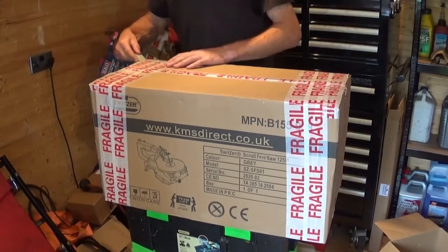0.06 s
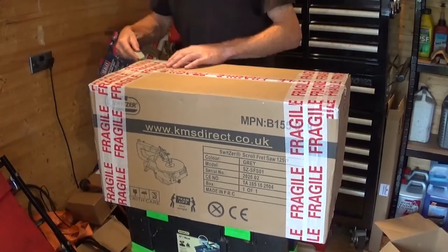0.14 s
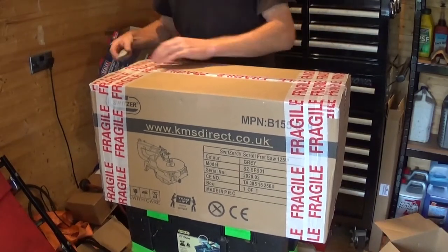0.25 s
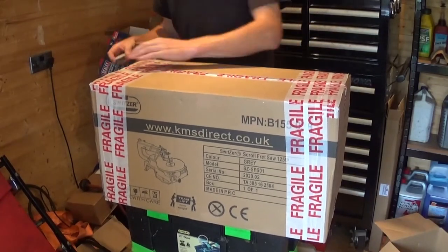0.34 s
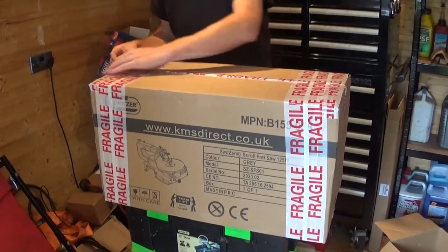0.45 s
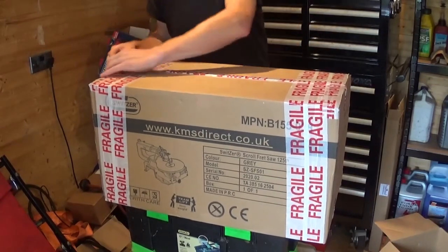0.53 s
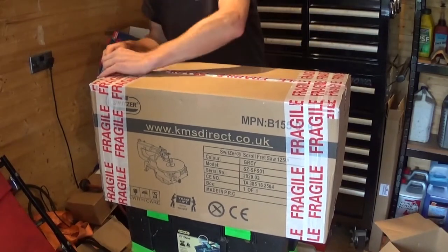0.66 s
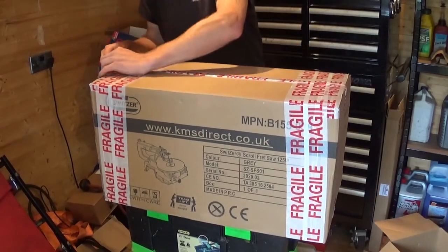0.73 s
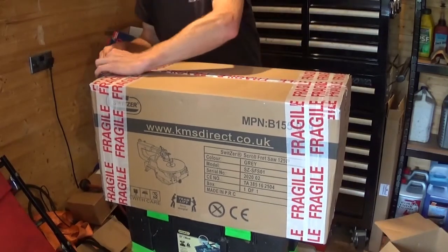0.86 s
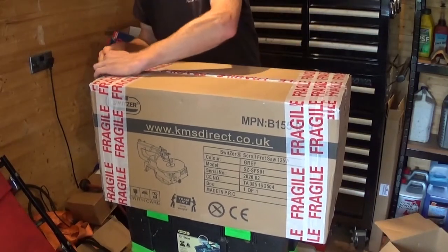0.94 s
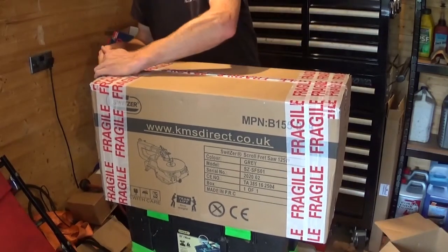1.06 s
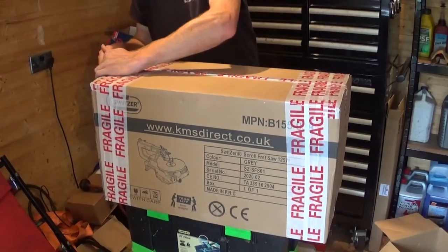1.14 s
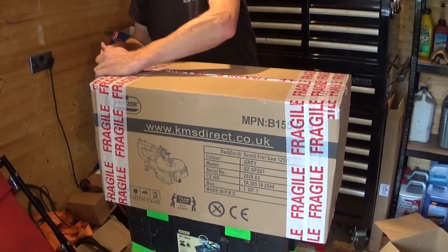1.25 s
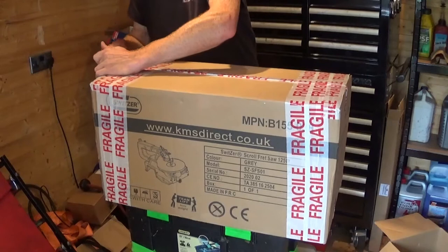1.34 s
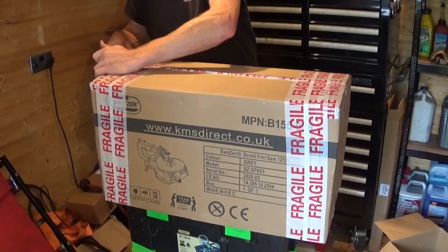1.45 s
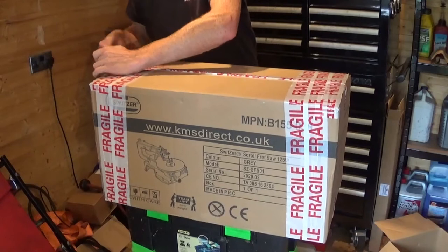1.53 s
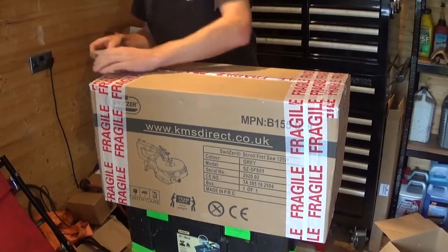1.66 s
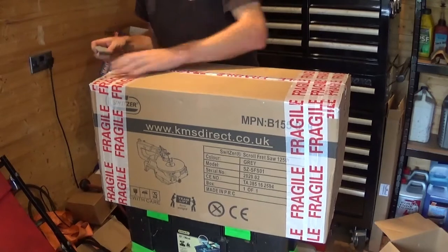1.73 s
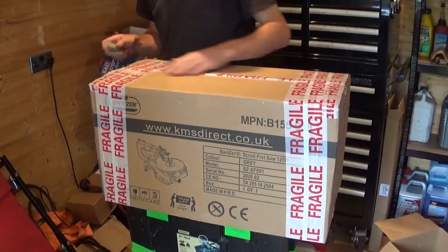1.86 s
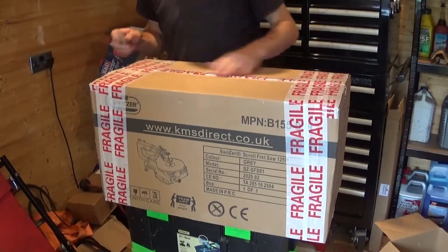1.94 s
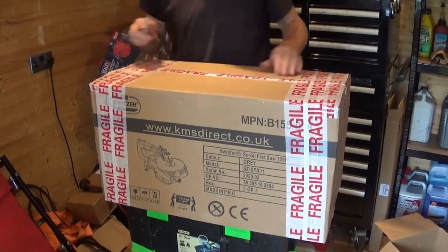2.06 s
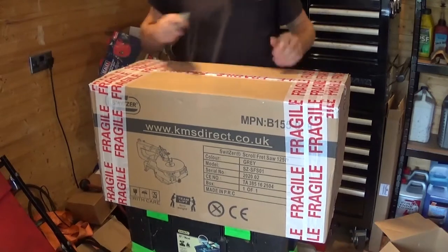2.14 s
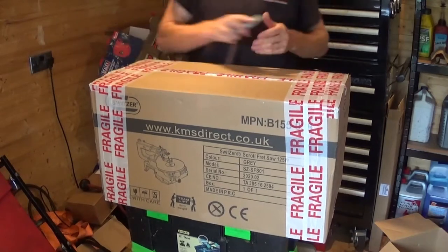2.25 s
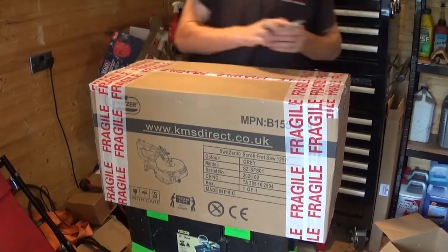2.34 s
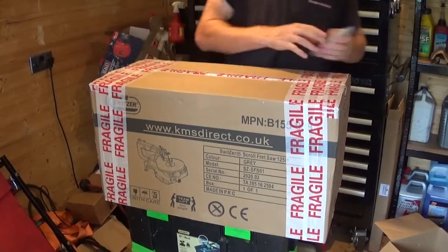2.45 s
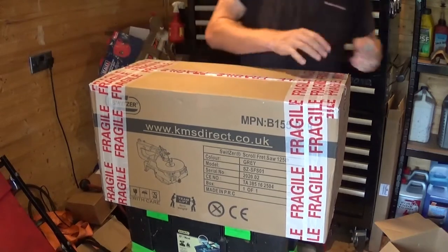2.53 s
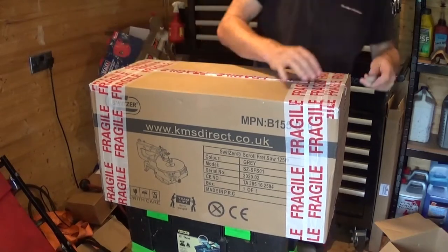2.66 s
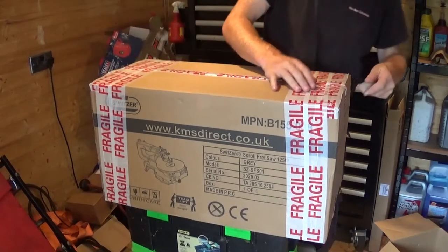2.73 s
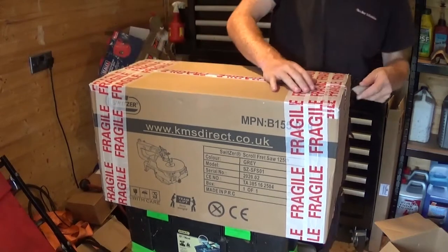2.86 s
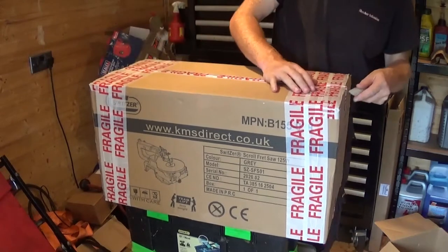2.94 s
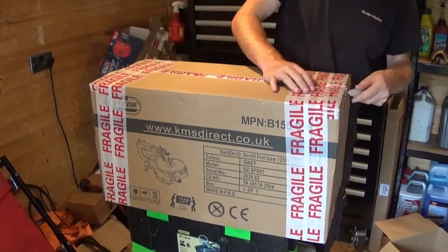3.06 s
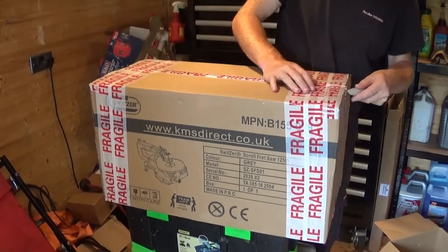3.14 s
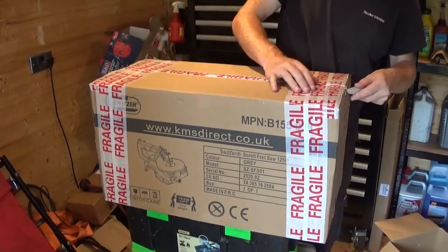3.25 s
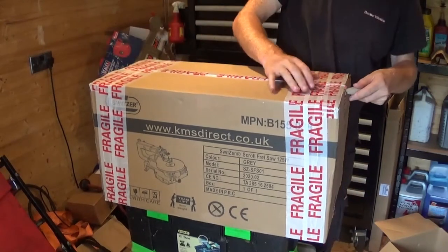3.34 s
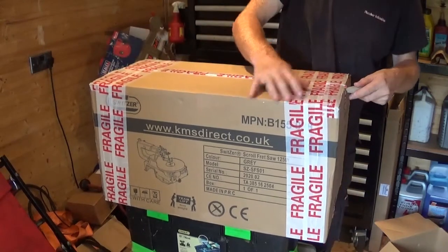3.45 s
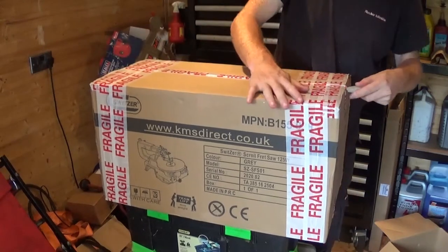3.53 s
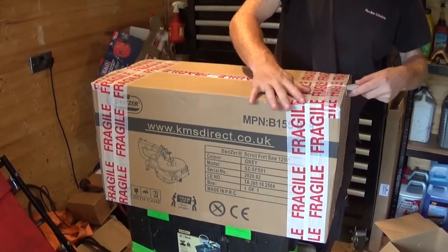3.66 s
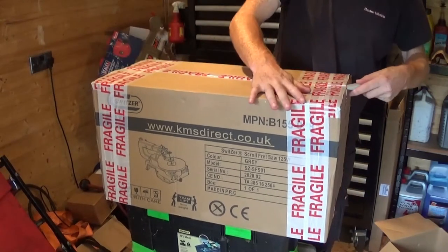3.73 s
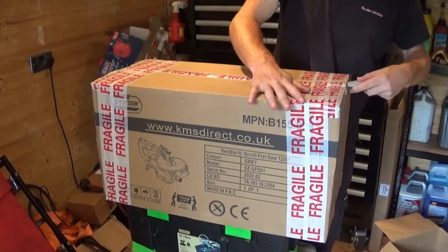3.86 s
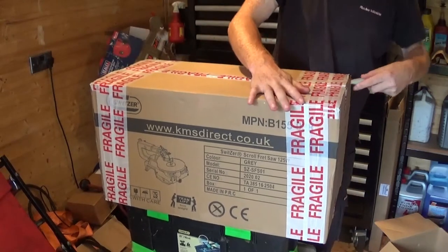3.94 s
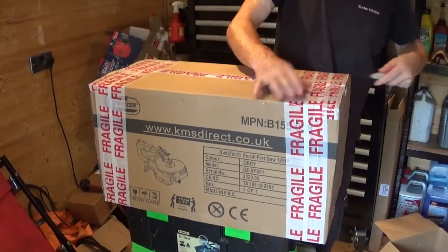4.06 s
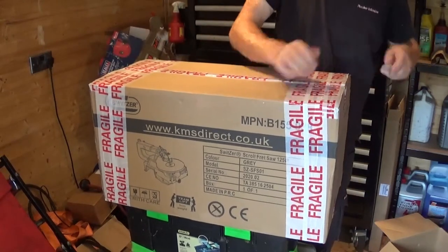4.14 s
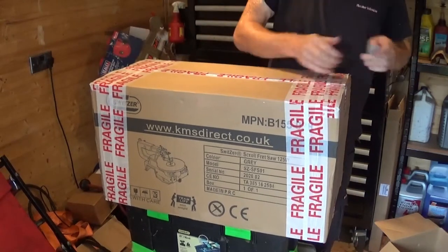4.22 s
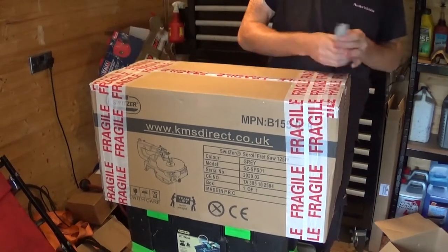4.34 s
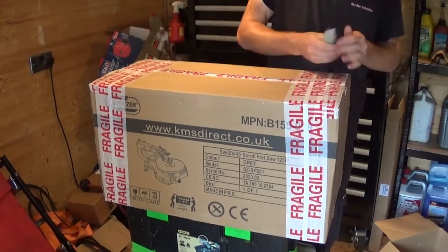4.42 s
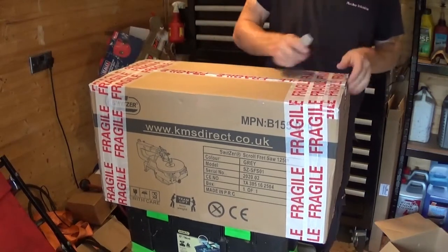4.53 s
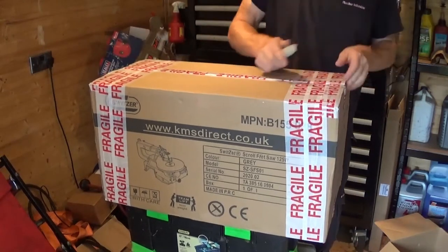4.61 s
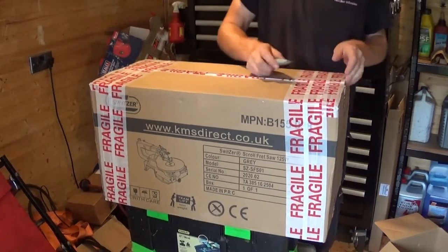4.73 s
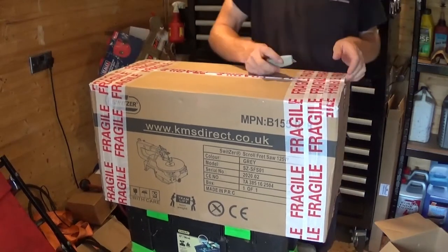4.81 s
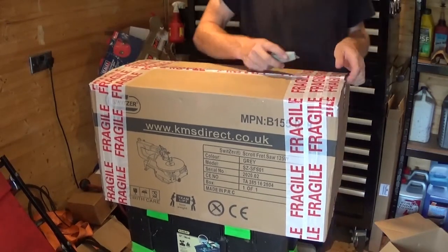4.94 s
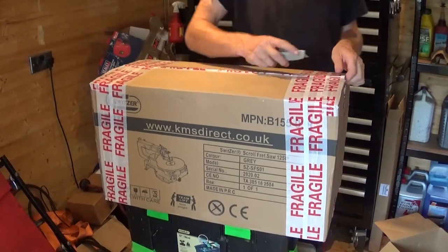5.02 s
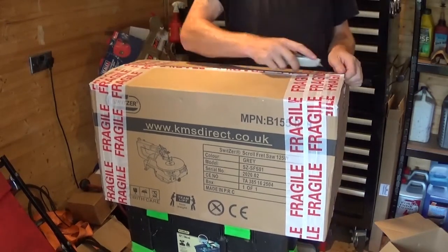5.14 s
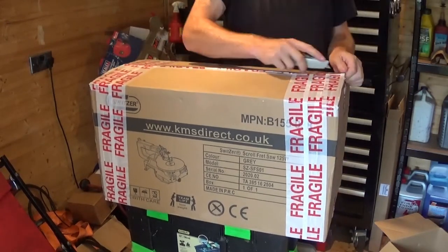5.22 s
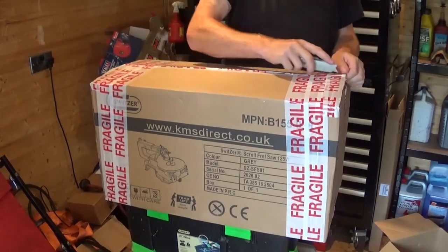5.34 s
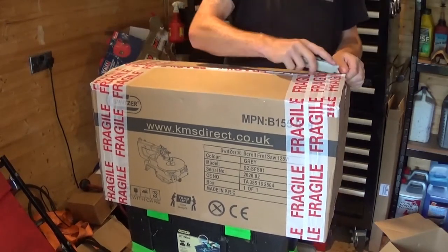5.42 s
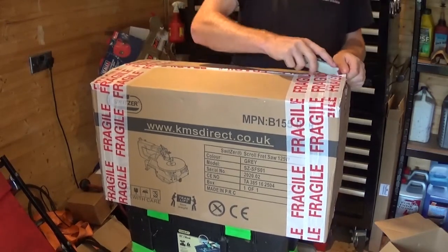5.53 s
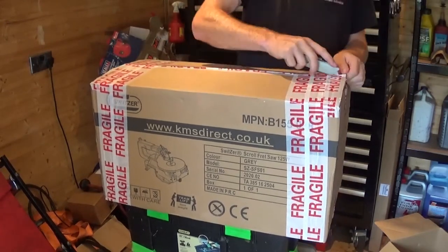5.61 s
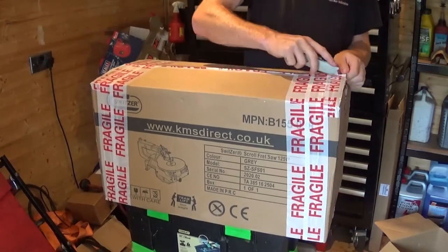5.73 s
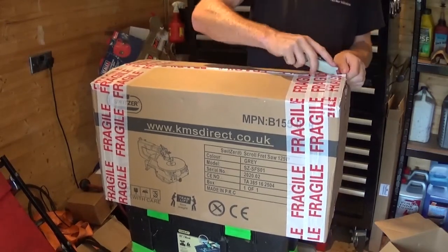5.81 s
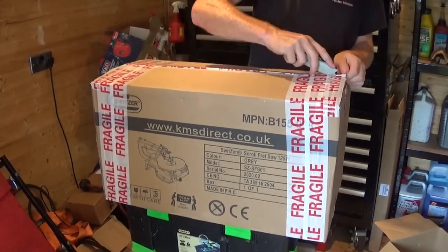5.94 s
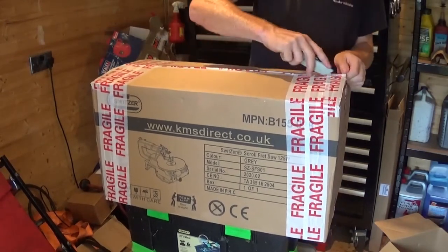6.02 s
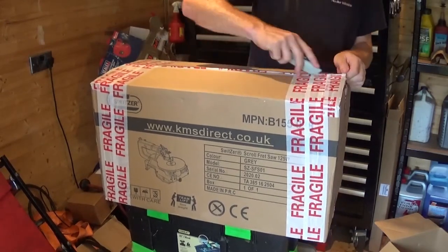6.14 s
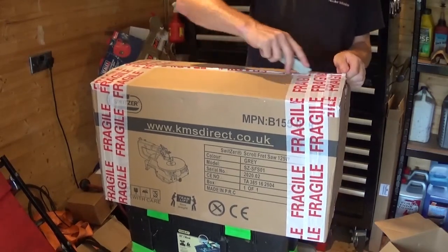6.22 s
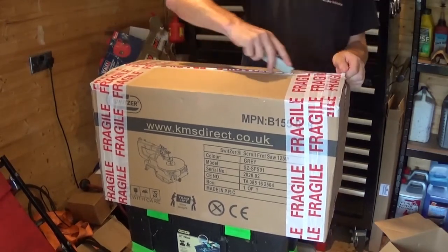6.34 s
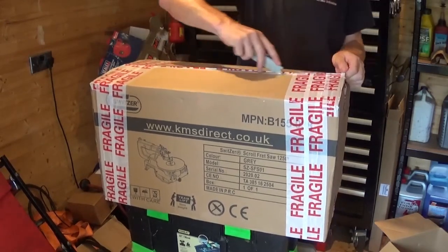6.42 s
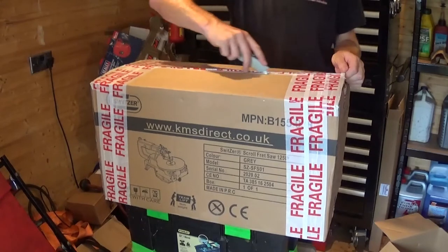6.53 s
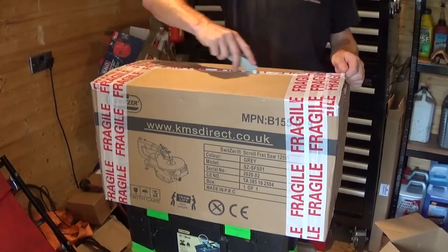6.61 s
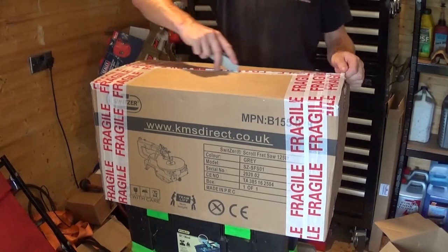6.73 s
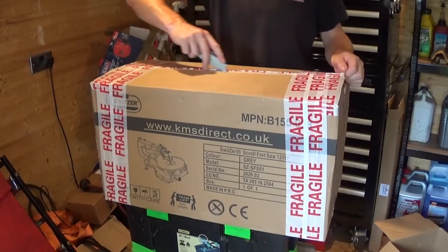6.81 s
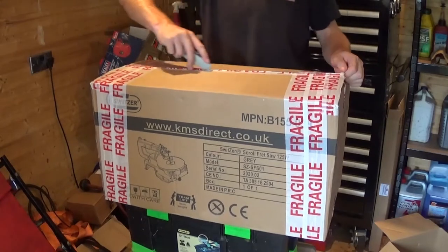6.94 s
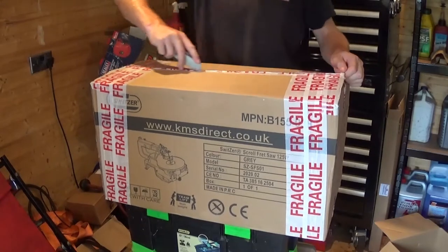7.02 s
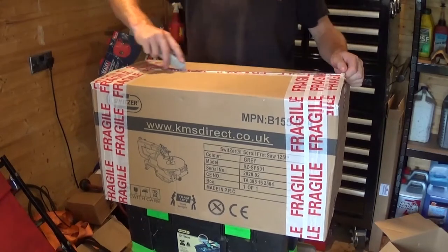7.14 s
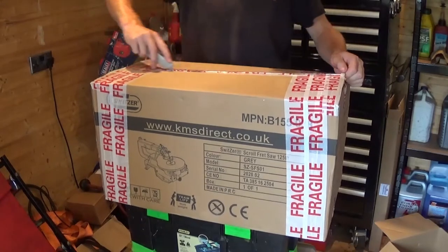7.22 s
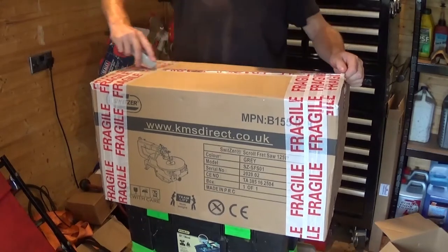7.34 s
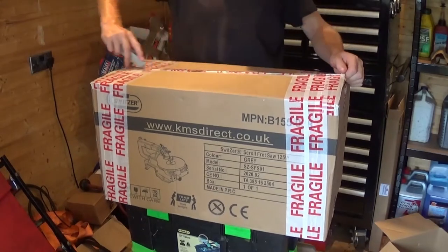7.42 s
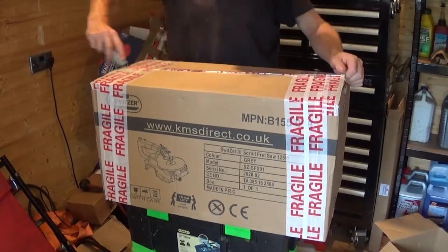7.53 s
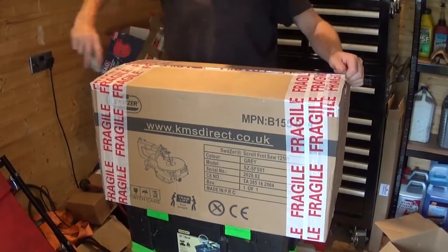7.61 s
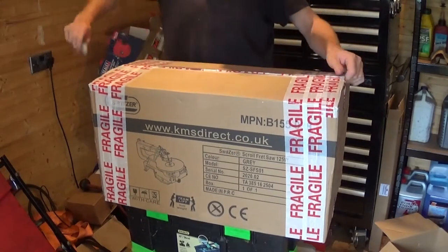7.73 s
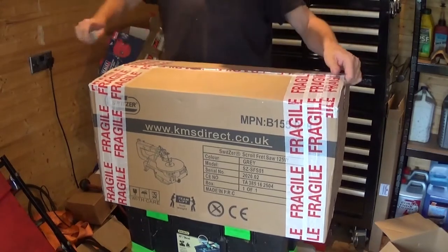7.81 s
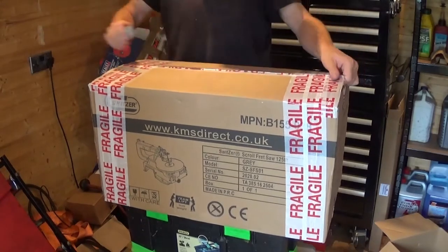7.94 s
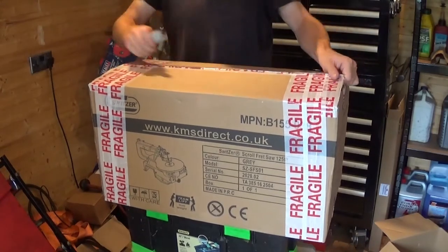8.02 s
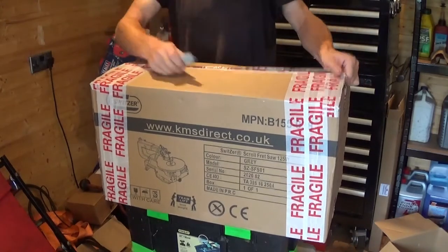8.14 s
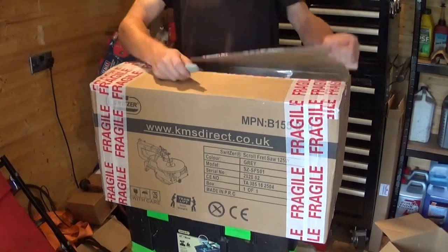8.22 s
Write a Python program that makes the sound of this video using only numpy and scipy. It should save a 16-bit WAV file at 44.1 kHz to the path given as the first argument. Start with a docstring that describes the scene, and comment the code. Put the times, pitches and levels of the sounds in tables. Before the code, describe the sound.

Hands rub a cardboard box and a knife cuts its packing tape with sharp snaps, then a long rasping slit.

```python
"""A utility knife opens a big taped carton in a small workshop, over hiss, hum and faint camera ticks.
First hands slide and bump on the lid; friction and impact drive tape, board and hollow box together.
Short strokes then cut the tape at both ends, fibres breaking and taut tape snapping; between them
fingers squeak, the carton settles, and knife and nails tap. From six seconds one long slit runs down
the seam, and at eight a flap tears free."""
import sys
import numpy as np
from scipy import signal
from scipy.fft import rfft, irfft
from scipy.io import wavfile

SR = 44100
rng = np.random.default_rng(int(sys.argv[2]) if len(sys.argv) > 2 else 0)


def int16_out(signal):
    """Quantize to a 16-bit WAV file."""
    q = np.round(np.clip(np.atleast_2d(signal).T, -1, 1) * 32767)
    wavfile.write(sys.argv[1], SR, q.astype(np.int16))


N = 364707
TIME = np.arange(N) / SR


def undb(db):
    """Amplitude grows tenfold for every 20 dB."""
    return 10 ** (np.asarray(db) / 20)


def unit(x):
    """Normalisation: scale to an rms of 1."""
    return x / np.sqrt(np.mean(x ** 2))


def convolve(x, impulse_response):
    """A linear system convolves its input with its impulse response."""
    return signal.fftconvolve(x, impulse_response)[:N]


def response(spectrum, modes=(), size=8192):
    """Minimum-phase impulse response of unit energy: resonance peaks on a broad spectrum."""
    hz = np.maximum(np.fft.rfftfreq(size, 1 / SR), 1)
    knots_hz, knots_db = np.transpose(spectrum)
    broad = undb(np.interp(np.log(hz), np.log(knots_hz), knots_db))
    peaks = sum(undb(db) / (1 + (2 * (hz - centre) / width) ** 2) for centre, width, db in modes)
    cepstrum = irfft(np.log(broad * (1 + peaks)))
    ring = irfft(np.exp(rfft(2 * cepstrum[:size // 2], size)))
    return ring / np.linalg.norm(ring)


def colour(x, spectrum, modes=()):
    """Source and filter: the excitation x takes on a spectrum and its resonances."""
    return convolve(x, response(spectrum, modes))


def walk(rate):
    """Slow noise of rms 1: straight lines join random values, rate per second."""
    steps = rng.standard_normal(N)
    return unit(np.interp(TIME * rate, np.arange(N), steps))


def spread(mid, side, width, bass_hz):
    """Mid-side stereo: long waves reach two nearby points alike, so the side loses its bass."""
    side = signal.sosfilt(signal.butter(1, bass_hz, "high", fs=SR, output="sos"), side)
    return mid + width * side * np.array([[1], [-1]])


# Spectrum of the hiss. Each row: frequency in Hz, relative spectral density in dB.
HISS_SPECTRUM = [(25, -15), (96, -8), (178, -6.5), (500, 0), (1000, -1), (1860, -3), (2620, -0.5),
                 (3400, -2.5), (4200, -4), (9000, -5), (11000, -11.5)]
def background(hiss_db=-59.5, hum_db=-80.5, hum_hz=102, chirp_db=-52, chirp_hz=3490):
    """Noise floor: broadband hiss, a mains hum and the camera's periodic train of tiny tone bursts."""
    mid, side = (colour(rng.standard_normal(N), HISS_SPECTRUM) for _ in range(2))
    hiss = undb(hiss_db + .5 * walk(7)) * spread(mid, side, width=0.59, bass_hz=20)
    hum = undb(hum_db) * np.sqrt(2) * np.sin(2 * np.pi * hum_hz * TIME)
    from_peak_s = TIME % .04 - .0188  # 25 bursts a second
    envelope = np.exp(-(from_peak_s / 0.0033) ** 2)
    chirp = envelope * np.sin(2 * np.pi * chirp_hz * from_peak_s + .6 * walk(19))
    return hiss + hum + undb(chirp_db + 0.73 * walk(24.4)) * chirp


def grains(rate, spread_db):
    """Shot noise: slips and breaking fibres are random impulses of unequal size, rate per second."""
    hit = rng.random(N) < rate / SR
    size = undb(spread_db * np.minimum(rng.standard_normal(N), 2))
    return unit(hit * size * rng.choice([-1, 1], N))


def strokes(table, hollow_re_board_db, end_share, curve):
    """Force envelopes on surface, board and hollow: each stroke builds, slackens and lifts off."""
    forces = np.zeros((3, N))
    for start, rise, length, db, board_db in table:
        shape = np.interp(TIME - start, [0, rise, max(length, rise)], [0, 1, end_share], right=0)
        path_db = np.array([[0], [board_db], [board_db + hollow_re_board_db]])
        forces += undb(db + path_db) * shape ** curve
    return forces


# Normal modes of the carton. Each row: frequency in Hz, width in Hz, dB relative to the broad response.
CARTON_MODES = [(200, 9.4, 1), (253, 24, -0.5), (368, 16, -1), (403, 23, -5), (528.3, 95, 4.5),
                (659, 24, 1), (1020, 9, -31), (1162, 150, -4.5), (1322, 15, -1.5), (1590, 44, -6),
                (1857, 36, -9), (2066, 43, -5)]
# Spectrum of the corrugated board. Each row: frequency in Hz, relative level in dB.
BOARD_SPECTRUM = [(250, -26.5), (500, 0.5), (750, 1.5), (1200, -0.5), (1900, -0.5), (2600, -2), (4500, -11),
                  (10000, -68)]
def carton(slips, surface_spectrum, hollow_spectrum, forces):
    """Forced vibration: the same slips radiate from the surface, the board and the hollow box."""
    surface_force, board_force, hollow_force = forces
    surface = colour(slips * surface_force, surface_spectrum)
    board = colour(slips * board_force, BOARD_SPECTRUM, CARTON_MODES)
    hollow = colour(slips * hollow_force, hollow_spectrum, CARTON_MODES)
    return surface + board + hollow


# Spectra of rubbing skin, cracking tape and the hollow box driven at its stiff ends.
# Each row: frequency in Hz, relative level in dB.
SKIN_SPECTRUM = [(800, -64), (1800, -10), (2700, -1.5), (4000, 4.5), (5500, 9), (7000, 7.5), (9500, 7.5),
                 (11000, -3)]
CRACK_SPECTRUM = [(500, -15), (1800, -47), (3200, -1), (5200, 2.5), (7000, 3.5), (9500, 0), (11000, -2)]
STIFF_END_SPECTRUM = [(25, -34), (65, -21), (125, -29), (170, -9), (215, -4.5), (340, 2), (530, 7.5),
                      (800, -9), (2000, -46), (8000, -82)]
# A hand lands and skids to rest.
# Each row: start in seconds, surface level in dB, board level in dB relative to the surface.
HAND_LANDINGS = [(0, -30, -8.5), (0.374, -43.5, -9.5), (0.536, -45, -9), (0.707, -40.5, -3.5),
                 (.862, -45, -6.5), (1.149, -48, -5.5), (1.398, -44.5, -6), (1.484, -46.5, -1.5),
                 (2.659, -48, -4), (2.931, -54, -15), (3.339, -50, -0.5), (3.404, -44.5, -2.5),
                 (4.479, -47.5, -4.5), (4.575, -45, -4.5), (7.549, -42, -11)]
# A resting hand slides on, swelling and fading with its speed.
# Each row: start and length in seconds, surface level in dB, board level in dB relative to the surface.
HAND_SLIDES = [(0.461, 0.1, -48.5, -9), (0.58, 0.12, -50.5, -1), (0.71, 0.19, -48, -15),
               (1.187, 0.11, -51, 2.5), (1.28, 0.15, -38, -8.5), (1.7, .33, -32.5, -16),
               (2.01, 0.64, -57.5, -5), (2.813, 0.14, -56.5, -4.5), (3.415, 0.17, -37.5, -12),
               (3.606, 0.46, -46, -1.5), (4.24, 0.25, -55.5, -13), (4.657, 0.19, -50.5, -8),
               (4.829, 0.16, -48, -2.5), (5.038, 0.21, -43, -5), (7.631, 0.26, -41.5, -4.5),
               (7.84, 0.21, -46, -1.5)]
def rubs(landing_rise_s=0.002, landing_length_s=0.12, slide_peak_share=0.4, crinkle_db=-11):
    """Sliding friction: skin catches on tape and card in a fine grain, and the tape sometimes crinkles."""
    slips = grains(rate=12000, spread_db=4.0) * undb(1.2 * walk(90) + 1.1 * walk(30))
    crinkles = grains(rate=66, spread_db=5.5)
    landings = [(start, landing_rise_s, landing_length_s, *levels) for start, *levels in HAND_LANDINGS]
    slides = [(start, slide_peak_share * length, length, *levels)
              for start, length, *levels in HAND_SLIDES]
    forces = strokes(landings, hollow_re_board_db=-3, end_share=0.037, curve=1.25)
    forces += strokes(slides, hollow_re_board_db=-3, end_share=0.012, curve=0.72)
    brushing = carton(slips, SKIN_SPECTRUM, STIFF_END_SPECTRUM, forces)
    return brushing + undb(crinkle_db) * colour(crinkles * forces[0], CRACK_SPECTRUM)


def impact(decay_s, click_ratio, size=4096):
    """Impulsive excitation of unit energy: a clean click, then an exponentially dying scatter."""
    t = np.arange(size) / SR
    burst = rng.standard_normal(size) * np.exp(-t / decay_s) * np.minimum(t / decay_s * 2, 1)
    burst[0] = click_ratio * np.linalg.norm(burst)
    return burst / np.linalg.norm(burst)


def strike(start_s, peak_db, force, body):
    """Transient response: a force sets a body ringing, scaled to the given peak level."""
    ring = signal.fftconvolve(force, body)
    return np.pad(undb(peak_db) * ring / np.abs(ring).max(), (int(start_s * SR), N))[:N]


# The hollow box driven in the slack middle of its lid. Each row: frequency in Hz, relative level in dB.
SLACK_LID_SPECTRUM = [(25, -38), (65, -21.5), (125, -27), (160, -9.5), (200, -1), (340, 2.5), (530, 0),
                      (800, -7.5), (2000, -62.5), (8000, -82)]
# Hands and knife bump the box. Each row: start in seconds, peak level of the hollow in dB.
BOX_BUMPS = [(0.549, -39.5), (0.711, -30.5), (2.076, -46), (2.189, -38), (4.497, -41), (4.618, -42),
             (4.81, -41.5), (4.895, -33.5), (4.987, -37), (5.112, -47), (5.175, -41), (5.355, -47),
             (6.024, -27.5), (7.101, -16), (8.154, -20)]
def bumps(board_re_hollow_db=2.5):
    """Modal ringing: each soft blow excites the panels' modes in its own proportions."""
    hollow = response(SLACK_LID_SPECTRUM, CARTON_MODES)
    board = response(BOARD_SPECTRUM, CARTON_MODES)
    out = np.zeros(N)
    for start, db in BOX_BUMPS:
        force = impact(decay_s=0.011, click_ratio=1.1)
        out += strike(start, db, force, hollow)
        out += strike(start, db + board_re_hollow_db, force, board)
    return out


# Spectrum of tape being cut. Each row: frequency in Hz, relative level in dB.
CUT_SPECTRUM = [(800, -36), (1800, 4.5), (2700, 7), (4000, 4.5), (5500, 4.5), (7000, 4.5), (9500, 2.5),
                (11000, -6)]
# Short cuts and, last, the tearing flap.
# Each row: start, rise and length in seconds, tape level in dB, board level in dB relative to the tape.
CUTS_AND_TEARS = [(1.234, 0.0011, .058, -18.5, -9), (1.275, 0.014, 0.031, -27, 1.5),
                  (3.478, 0.012, 0.059, -23, -7.5), (3.752, 0.0013, 0.018, -28.5, -12.5),
                  (3.764, 0.0055, 0.046, -22, -4.5), (3.851, 0.0014, 0.018, -27.5, -3),
                  (3.902, 0.00088, 0.032, -30.5, -7), (5.785, 0.0014, 0.05, -22.5, -9),
                  (5.838, 0.0051, 0.065, -23.5, -10), (8.047, 0.0018, 0.045, -38, -2.5),
                  (8.0755, 0.0024, 0.057, -18.5, -4), (8.128, .0016, 0.039, -18.5, 2.5)]
def cuts():
    """Acoustic emission: tape and board rip in a dense burst of breaking fibres."""
    breaks = grains(rate=13000, spread_db=4.0) * undb(2.24 * walk(400))
    forces = strokes(CUTS_AND_TEARS, hollow_re_board_db=-2.5, end_share=0.3, curve=0.86)
    return carton(breaks, CUT_SPECTRUM, STIFF_END_SPECTRUM, forces)


# Taut tape snaps at the blade. Each row: start in seconds, peak level in dB.
TAPE_SNAPS = [(1.2351, -4.5), (5.7859, -6.5), (5.8392, -4), (6.0047, -19.5), (6.0205, -10), (6.057, -11.5),
              (6.08, -13.5), (6.091, -11), (6.206, -7.5), (6.244, -8), (6.3114, -5.5), (6.4545, -12.5),
              (6.635, -13.5), (7.097, -7), (7.486, -7.5), (7.55, -13.5), (8.0768, -5)]
def snaps():
    """Sudden release of tension: stretched tape parts with a dry, bright crack."""
    tape = response(CRACK_SPECTRUM, modes=[(5900, 2300, -4.5), (9070, 710, 1.0)])
    return sum(strike(start, db, impact(decay_s=0.00078, click_ratio=0.67), tape)
               for start, db in TAPE_SNAPS)


# Fingers squeak on the glossy tape.
# Each row: start and length in seconds, first and last pitch in Hz, level in dB.
FINGER_SQUEAKS = [(1.596, 0.058, 2620, 2620, -56), (1.727, 0.055, 2550, 2580, -41),
                  (1.799, 0.18, 1620, 1614, -45.5), (1.893, 0.052, 1350, 1280, -40),
                  (4.283, 0.11, 2590, 2410, -51), (5.577, 0.094, 2900, 3830, -59)]
def squeaks(jitter=0.034):
    """Stick-slip oscillation: skin grips and lets go fast enough to give a faint, rough whistle."""
    waver = 1 + jitter * walk(500)
    grip = unit(undb(6.7 * walk(170)))
    out = np.zeros(N)
    for start, length, first_hz, last_hz, db in FINGER_SQUEAKS:
        along = np.clip((TIME - start) / length, 0, 1)
        hz = (first_hz + (last_hz - first_hz) * along) * waver
        out += undb(db) * np.sin(np.pi * along) * np.sin(2 * np.pi * np.cumsum(hz) / SR)
    return out * grip


def rocking(start_s=2.075, length_s=0.11, db=-65):
    """Damped vibration: let go, the heavy carton settles on its stand with a low shudder."""
    spectrum = [(20, -12), (45, -2), (90, -1), (140, -13), (400, -15), (2000, -72)]  # Hz, dB
    shudder = colour(rng.standard_normal(N), spectrum)
    envelope = np.interp(TIME - start_s, [0, .02, length_s / 2, length_s], [0, 1, 1, 0])
    return undb(db) * shudder * envelope


# Knife and fingernails tap. Each row: start in seconds, peak level in dB, pitch in Hz.
LIGHT_TAPS = [(2.662, -25, 1660), (2.824, -20.5, 3760), (2.933, -25, 2720), (3.342, -27, 4230),
              (4.178, -32.5, 4300), (5.483, -20, 6400), (5.549, -33.5, 5960), (8.260, -19, 6000)]
def taps():
    """Heavily damped resonance: each small, hard contact rings briefly round its own pitch."""
    out = np.zeros(N)
    for start, db, hz in LIGHT_TAPS:
        contact = response([(hz / 8, -22), (hz / 2, -9), (hz, 0), (hz * 1.96, -9), (hz * 4, -24)])
        out += strike(start, db, impact(decay_s=0.0072, click_ratio=1.0), contact)
    return out


# Spectrum of tape being slit. Each row: frequency in Hz, relative level in dB.
SLIT_SPECTRUM = [(800, -32), (1800, -18), (3000, -11.5), (4500, 3), (6300, 6.5), (8000, 2), (9800, 4.5),
                 (11000, -8.5)]
# The blade's drag along the seam: it bites on entry and catches twice near the far end.
# Each row: time in seconds, tape level in dB, board level in dB relative to the tape.
SEAM_DRAG = [(6.003, -40.5, 4), (6.09, -40, 7), (6.13, -42.5, 0), (6.2, -43.5, 2), (6.34, -35.5, -8),
             (6.5, -37, -3.5), (6.67, -33.5, -4.5), (7.073, -35, -5), (7.103, -28.5, 4), (7.275, -38, 0),
             (7.298, -32.5, 6), (7.491, -29, 1.5), (7.535, -43.5, 2.5)]
def slit(flute_hz=74, flute_depth_db=1.3, hollow_re_board_db=-9, slack_gain_db=8.5, crinkle_db=-12):
    """Amplitude modulation: the blade's rasp swells at each flute of the board that it crosses."""
    times, *levels = np.transpose(SEAM_DRAG)
    tape_db, board_db = (np.interp(TIME, times, level) for level in levels)
    start, end = times[0], times[-1]
    travel = np.interp(TIME, [start, end], [0, 1]) ** 1.6  # the blade speeds up
    hollow_db = hollow_re_board_db + slack_gain_db * np.sin(np.pi * travel)  # mid-lid drums most
    contact = np.interp(TIME, [start - .005, start, end, end + 0.013], [0, 1, 1, 0])
    forces = contact * undb([tape_db, tape_db + board_db, tape_db + board_db + hollow_db])
    crossing_hz = flute_hz * (1 + 0.11 * walk(25))
    flutes = np.sin(2 * np.pi * np.cumsum(crossing_hz) / SR)
    slips = unit(grains(rate=8000, spread_db=2.5) * undb(flute_depth_db * flutes + 2.17 * walk(140)))
    crinkles = grains(rate=33, spread_db=1)
    rasp = carton(slips, SLIT_SPECTRUM, SLACK_LID_SPECTRUM, forces)
    return rasp + undb(crinkle_db) * colour(crinkles * forces[0], CRACK_SPECTRUM)


def reflections(x, low_t60_s=0.29, treble_t60_s=0.31, size=16384):
    """Reverberation: dense echoes from timber walls and full shelves decay exponentially in two bands."""
    t = np.arange(size) / SR
    noise = rng.standard_normal(size)
    low = signal.sosfiltfilt(signal.butter(2, 4000, fs=SR, output="sos"), noise)
    tail = low * undb(-60 * t / low_t60_s) + (noise - low) * undb(-60 * t / treble_t60_s)
    tail *= np.clip((t - .002) / 0.001, 0, 1)  # the first echo comes after 2 ms
    return convolve(x, tail / np.linalg.norm(tail))


def workshop(x, room_db=-6.5, move_hz=.9, wall_leak_hz=230):
    """Time-varying paths: moving arms shift the sound between sets of echoes; thin walls leak bass."""
    x = signal.sosfilt(signal.butter(1, wall_leak_hz, "high", fs=SR, output="sos"), x)
    turn = 2 * np.pi * move_hz * TIME
    mid, side = (reflections(x * np.cos(turn)) + reflections(x * np.sin(turn)) for _ in range(2))
    return undb(room_db) * spread(mid, side, width=0.62, bass_hz=322)


def scene(left_re_right_db=-.4, snap_room_db=-4):
    """Superposition: direct sound from the lid, the room's reverberation and the noise floor add."""
    handling = cuts() + rubs() + slit() + taps() + bumps() + squeaks() + rocking()
    cracks = snaps()
    pan = undb(np.array([[left_re_right_db], [-left_re_right_db]]) / 2)
    direct = (handling + cracks) * pan
    return direct + workshop(handling + undb(snap_room_db) * cracks) + background()


def record(dry):
    """Band limiting: a steep low-pass at 11050 Hz removes the top octave."""
    return signal.sosfilt(signal.ellip(10, .2, 70, 11050, fs=SR, output="sos"), dry)


dry = scene()
out = record(dry)
int16_out(out)
```